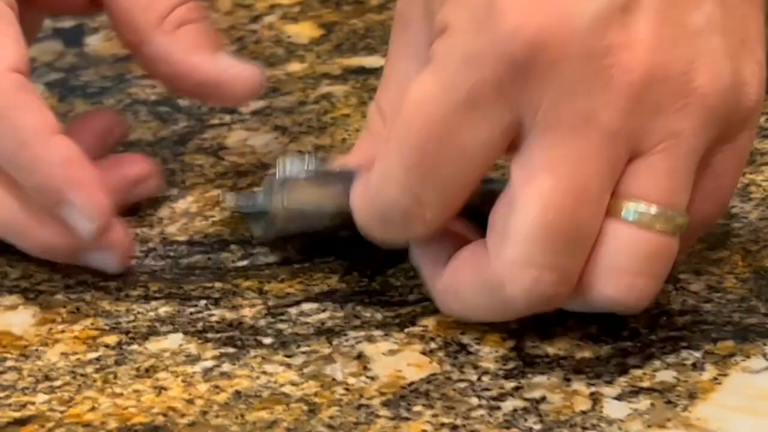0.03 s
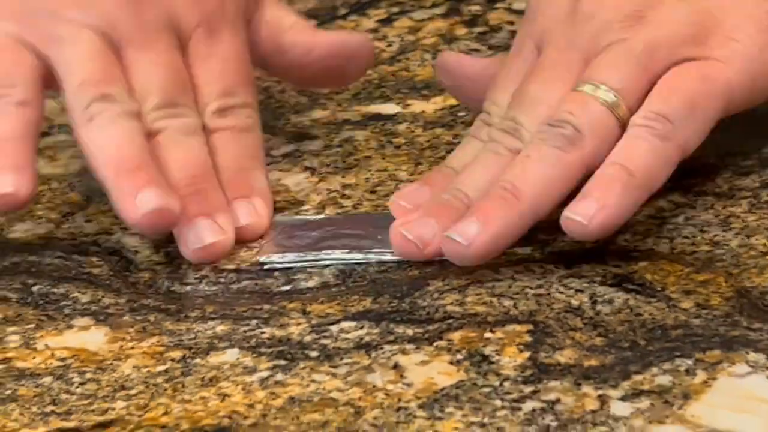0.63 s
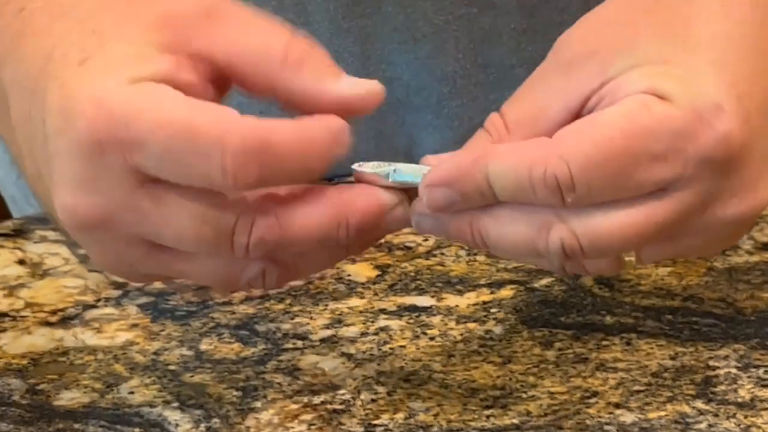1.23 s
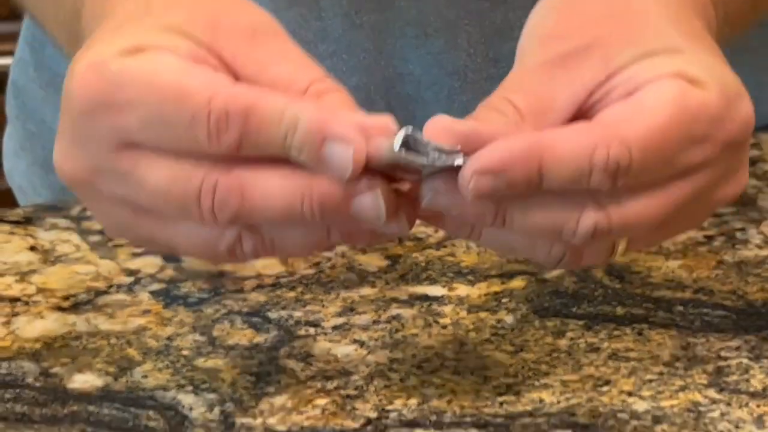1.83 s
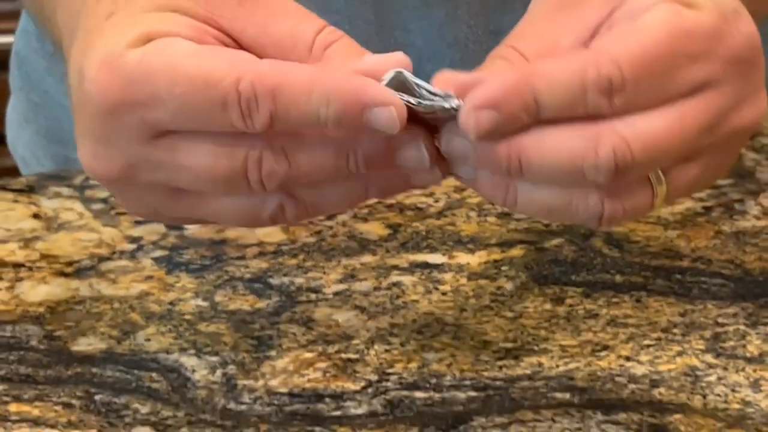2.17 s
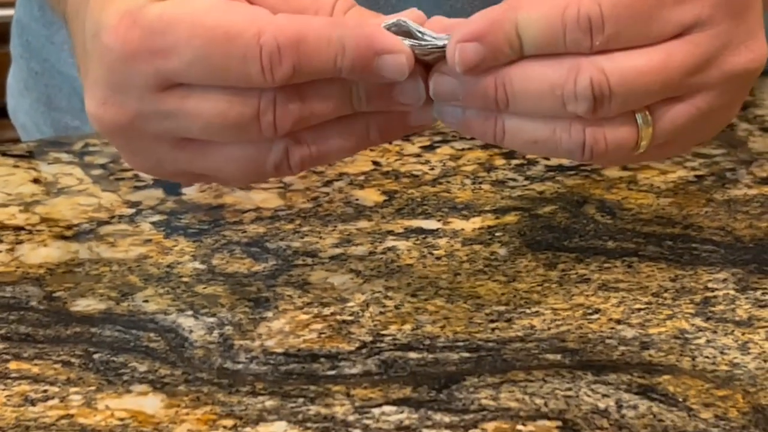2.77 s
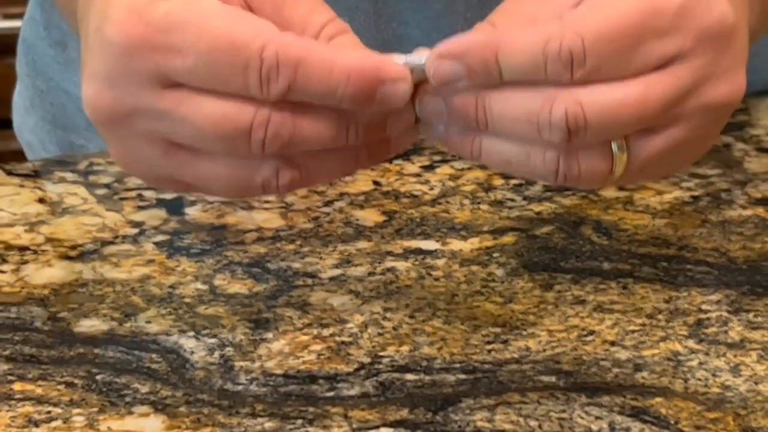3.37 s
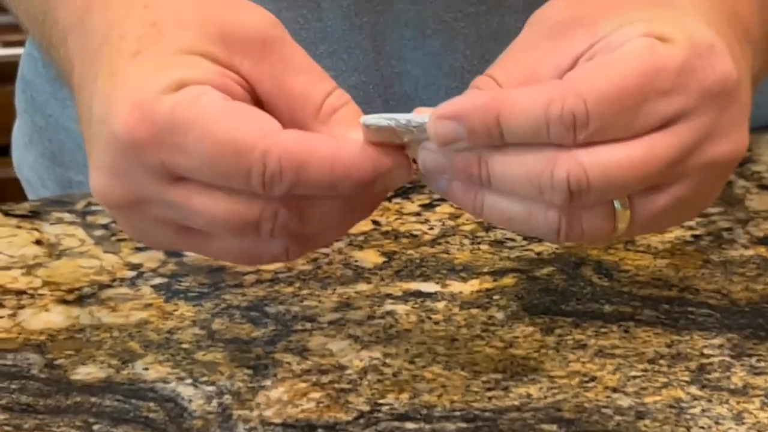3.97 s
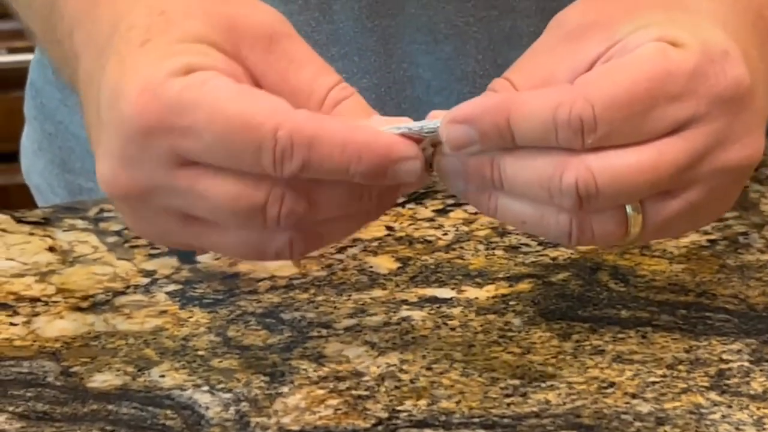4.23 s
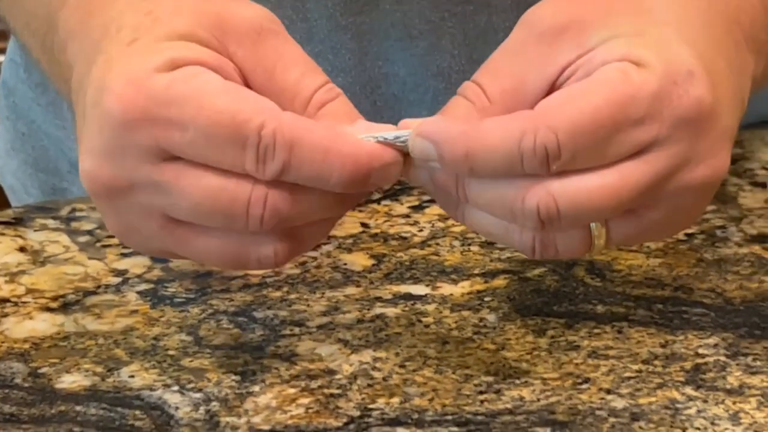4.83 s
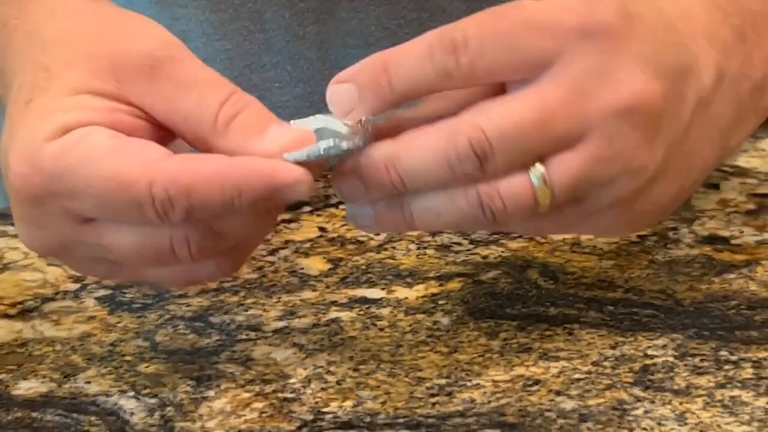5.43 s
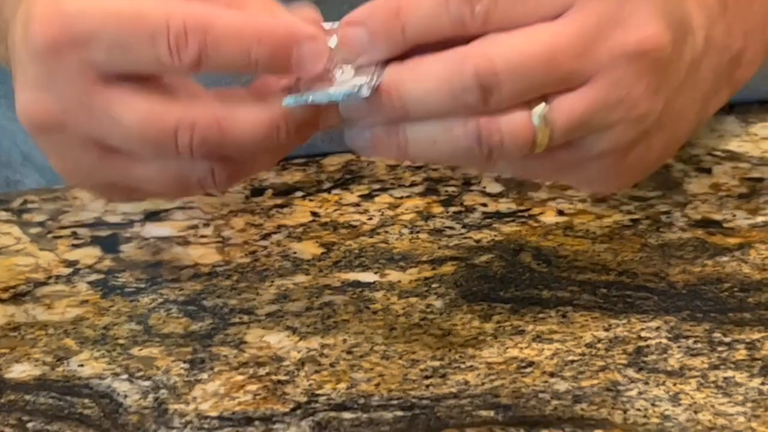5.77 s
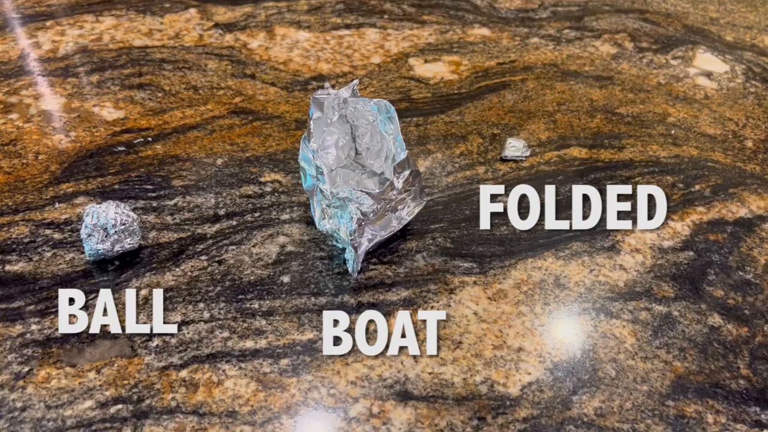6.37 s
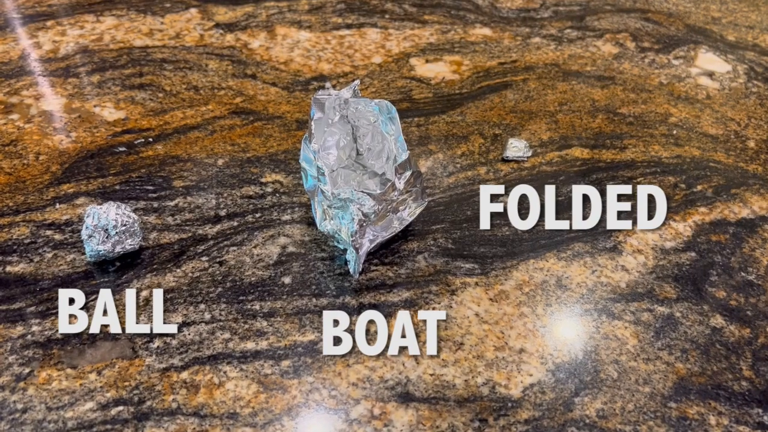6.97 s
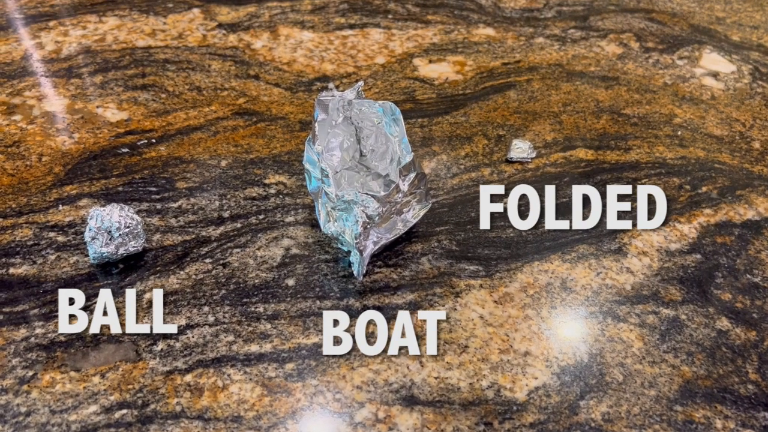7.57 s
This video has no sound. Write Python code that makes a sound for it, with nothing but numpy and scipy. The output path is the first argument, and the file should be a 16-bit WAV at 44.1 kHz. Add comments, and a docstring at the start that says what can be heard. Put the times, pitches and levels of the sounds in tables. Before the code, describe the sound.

Close, bright crinkling of foil being rubbed flat and folded tight by hand, thinning to scattered ticks in a softly humming kitchen.

```python
"""Bright crackle and rasp, close up: aluminium foil is smoothed on a stone counter, then folded and
pinched into a tight wad. With each push skin slips over the foil in tiny catches and wrinkles flip.
Creases snap, folded layers buckle with a duller pop, fingertips bump the foil and scrape its folds.
The small kitchen answers briefly; an appliance hums under it all."""
import sys
import numpy as np
from scipy import signal
from scipy.fft import rfft, irfft
from scipy.io import wavfile
from scipy.ndimage import map_coordinates

SR = 44100
rng = np.random.default_rng(int(sys.argv[2]) if len(sys.argv) > 2 else 0)


def unload_wav(signal):
    """Save mono or channel-first audio to the path in sys.argv[1] as 16-bit WAV at rate SR, clipped to [-1, 1]."""
    wavfile.write(
        sys.argv[1],
        SR,
        np.round(np.clip(np.atleast_2d(signal).T, -1, 1) * 32767).astype(np.int16),
    )


N = 334366
TIME_S = np.arange(N) / SR

# finger pushes: middle_s, half_length_s, rub_db, crinkle_db
PUSHES = [(0.054, 0.029, -41, -32), (0.137, 0.09, -42.5, -36), (0.306, 0.1, -43.5, -37),
          (0.43, 0.13, -41, -38.5), (0.66, 0.026, -47.5, -40.5), (0.699, 0.03, -39.5, -44),
          (0.818, 0.065, -49, -44.5), (0.922, 0.037, -40.5, -44.5), (0.983, 0.056, -43, -41),
          (1.039, 0.01, -39, -38), (1.107, 0.086, -45, -42), (1.278, 0.052, -53.5, -48.5),
          (1.459, 0.018, -48.5, -43.5), (1.559, 0.072, -49, -46), (1.631, 0.047, -49, -50.5),
          (1.749, 0.042, -51, -44), (1.84, 0.052, -54.5, -48), (1.969, 0.082, -51.5, -48),
          (2.203, 0.017, -57, -53.5), (2.309, 0.024, -52.5, -51), (2.433, 0.067, -56.5, -47.5),
          (2.782, 0.041, -61.5, -50.5), (3.02, 0.1, -71, -58.5), (3.365, 0.031, -40.5, -42.5),
          (3.469, 0.049, -52, -54), (3.56, 0.036, -41, -48.5), (3.672, 0.01, -52.5, -41.5),
          (3.74, 0.3, -65, -63), (3.895, 0.013, -53, -53), (4.151, 0.016, -65, -55),
          (4.315, 0.1, -78.5, -65.5), (4.698, 0.042, -48.5, -47.5), (4.837, 0.053, -56.5, -57),
          (4.917, 0.021, -54.5, -54.5), (5.058, 0.046, -59.5, -57), (5.35, 0.11, -63.5, -60.5),
          (5.43, 0.042, -56, -58.5), (5.505, 0.031, -65.5, -61), (5.686, 0.063, -70, -69),
          (5.891, 0.033, -64, -57), (6.04, 0.021, -77, -65.5), (6.372, 0.055, -77.5, -78),
          (6.778, 0.063, -74, -66), (7.267, 0.043, -70, -66.5), (7.42, 0.048, -60.5, -64),
          (7.559, 0.064, -60.5, -60)]
# skin on the flat strip: freq_hz, gain_db
FLAT_RUB_SPECTRUM = [(400, -13.5), (650, -19), (900, -4), (1150, -3.5), (1500, 2), (2300, 2), (3200, -3),
                     (4500, -13.5), (8000, -18.5)]
# skin on the wad: freq_hz, gain_db
WAD_RUB_SPECTRUM = [(300, -28.5), (480, -16), (1150, -8.5), (1550, 1.5), (2000, 2), (2700, -10.5),
                    (3800, -4.5), (6000, -20), (10000, -21.5)]
# flipping wrinkles: freq_hz, gain_db
CRINKLE_SPECTRUM = [(1000, -14), (2500, -8), (3700, -5.5), (5000, 1.5), (6300, 2.5), (6900, 0), (8600, 3.5),
                    (9900, -6.5), (11000, -21), (11700, -5.5), (12600, -30)]
# foil on stone: freq_hz, gain_db
COUNTER_SPECTRUM = [(80, -23.5), (220, -5), (600, -1), (860, 6), (2000, -21.5)]
# counter contact, offset from the rub level: time_s, offset_db
COUNTER_CONTACT = [(0.0, -4), (0.45, -6), (0.82, -27.5), (0.96, -10), (1.1, -22)]
# appliance tones: pitch_hz, rms_db
HUM_TONES = [(59, -65), (81.7, -52.5), (120, -61), (294.5, -74.5)]
# kitchen air: freq_hz, gain_db
AIR_SPECTRUM = [(25, -34.5), (60, -16.5), (140, -17.5), (300, -23), (500, -28), (640, -35), (1700, -38.5),
                (3000, -55), (12000, -60)]
# buckling layers: start_s, tick_db, pop_offset_db, ring_hz
BUCKLES = [(0.1328, -25, -4, 9000), (1.4492, -33, -1.5, 2510), (1.9524, -46.5, 10, 2190),
           (3.372, -28, -7, 1560), (3.6684, -39, -2.5, 7100), (4.7017, -33.5, 6.5, 1930),
           (4.818, -28, -0.5, 1790), (5.3251, -43.5, 7.5, 1880), (5.424, -45.5, -5, 1780),
           (7.245, -52.5, 2, 2270)]
# pop of the layers: freq_hz, gain_db
POP_SPECTRUM = [(600, -22), (1150, -22.5), (1600, 6.5), (2100, -1), (2700, -8.5), (3600, -5), (9000, -16)]
# fingertip and nail knocks: start_s, level_db
FINGER_BUMPS = [(1.1906, -38), (1.345, -41.5), (3.841, -42), (3.998, -40), (4.036, -50), (7.401, -42.5),
                (7.504, -43)]
# fingertip knock: freq_hz, gain_db
BUMP_SPECTRUM = [(200, 1), (1000, 7), (2200, 4), (3000, 0), (10000, -11)]
# fingertip drags along a fold: middle_s, half_length_s, resonance_hz, level_db
FOLD_SCRAPES = [(1.285, 0.066, 4660, -54.5), (1.666, 0.071, 4370, -70), (1.977, 0.039, 1300, -50.5),
                (2.808, 0.024, 3800, -50), (3.525, 0.013, 496, -61), (5.892, 0.025, 4800, -62.5),
                (6.791, 0.022, 5460, -65.5), (6.924, 0.024, 4670, -65.5), (7.008, 0.029, 5200, -66.5),
                (7.081, 0.033, 4800, -62.5)]
# single creases: start_s, level_db, resonance_hz
CREASE_TICKS = [(1.701, -30, 7000), (2.126, -34.5, 5900), (2.3008, -34.5, 5700), (2.305, -31, 7500),
                (2.322, -28.5, 5800), (2.3891, -36.5, 6300), (2.483, -35.5, 4870), (2.523, -31, 8100),
                (2.611, -44.5, 6940), (2.655, -39, 7000), (2.8549, -30, 4800), (2.9059, -34.5, 4700),
                (2.9298, -36, 8300), (2.967, -39, 4870), (2.985, -30, 8660), (3.0038, -21.5, 8200),
                (3.0147, -28.5, 6100), (3.3558, -21.5, 8300), (3.9494, -42.5, 8000), (4.155, -30, 8200),
                (4.2064, -41, 6370), (4.3375, -41, 7550), (4.3655, -44.5, 6000), (4.557, -50, 7240),
                (4.654, -31, 3700), (4.792, -40, 9000), (5.149, -46, 6500), (5.2958, -43.5, 2930),
                (5.3143, -43, 4250), (5.655, -47.5, 5600), (5.8277, -40, 8170), (6.812, -41.5, 4770)]
# microphone treble dips: centre_hz, width_hz, gain_db
MIC_DIPS = [(5324, 185, -41), (7603, 452, -29)]
# right microphone port resonance: centre_hz, width_hz
MIC_PORT = [(3150, 260)]


def undb(db):
    """Decibels to gain."""
    return 10 ** (np.asarray(db) / 20)


def unit(x):
    """Scale to rms 1."""
    return x / np.sqrt(np.mean(x ** 2))


def walk(rate_hz):
    """Slow random wander, spread near 1."""
    return np.sqrt(1.5) * np.interp(TIME_S * rate_hz, np.arange(N), rng.standard_normal(N))


def swell(peak_s, size):
    """Envelope: rises to 1 at peak_s, then decays."""
    age = np.arange(size) / SR / peak_s
    return age * np.exp(1 - age)


def colour(x, spectrum, size=2048):
    """Minimum-phase filter of unit energy, shaped to the spectrum."""
    hz, db = np.transpose(spectrum)
    bins_hz = np.maximum(np.fft.rfftfreq(size, 1 / SR), 1)
    gain = undb(np.interp(np.log(bins_hz), np.log(hz), db))
    cepstrum = irfft(np.log(gain))
    cepstrum[1:size // 2] *= 2
    cepstrum[size // 2 + 1:] = 0
    response = irfft(np.exp(rfft(cepstrum)))
    return signal.fftconvolve(x, response[None] / np.linalg.norm(response), axes=1)[:, :N]


def pan(left_db):
    """Stereo gains, left over right by left_db."""
    return undb(np.array([[left_db], [-left_db]]) / 2)


def radiate(x, left_db, scatter):
    """Each facet faces its own way: left and right get random shares of each impulse."""
    shares = 1 + scatter * rng.standard_normal((2, N))
    return x * shares / np.hypot(1, scatter) * pan(left_db)


def grains(level_db, rate_hz, spread_db, growth=0.4, ref_db=-49.5, bunch_db=1.5, bunch_hz=130):
    """Tiny random slips in bunches; rate_hz holds at ref_db, harder work makes more."""
    per_s = np.clip(rate_hz * undb(growth * (level_db - ref_db)), 1, SR / 2)
    fires = rng.random(N) < per_s / SR
    sizes = unit(undb(spread_db * np.minimum(rng.exponential(size=N), 4)))
    signs = np.sign(rng.standard_normal(N))
    bunches = unit(undb(bunch_db * walk(bunch_hz)))
    return fires * sizes * signs * np.sqrt(SR / per_s) * bunches * undb(level_db)


def finger_levels_db(release_stretch=1.084, shape=1.3, stir_fall_db_per_s=8.5, wander_db=3.5):
    """Rub and crinkle levels: pushes swell over the held foil's stir, which fades as it packs tighter."""
    stir_db = np.maximum(-47 - stir_fall_db_per_s * TIME_S, -92) + wander_db * walk(rate_hz=7.1)
    power = undb([stir_db, stir_db + 3]) ** 2  # rows: rub, crinkle
    for middle_s, half_s, rub_db, crinkle_db in PUSHES:
        near = np.abs(TIME_S - middle_s) < 10 * half_s
        offset_s = TIME_S[near] - middle_s
        away = np.maximum(-offset_s, offset_s / release_stretch) / half_s
        envelope = np.exp(-away ** shape)  # shape 1: pointed, 2: bell
        power[:, near] += (undb([[rub_db], [crinkle_db]]) * envelope) ** 2
    return 10 * np.log10(power)


def rubbing(level_db, fold_span_s=(2.2, 3.2), right_lag_s=0.00002):
    """Skin catches and slips on foil; the flat strip's broad rasp turns hollow as the wad thickens."""
    slips = grains(level_db, rate_hz=3800, spread_db=2.0)
    folded = np.interp(TIME_S, fold_span_s, [0, 1])
    flat_slips = radiate(slips * np.sqrt(1 - folded), left_db=-1.6, scatter=0.29)
    wad_slips = radiate(slips * np.sqrt(folded), left_db=1.0, scatter=0.24)
    left, right = colour(flat_slips, FLAT_RUB_SPECTRUM)
    flat = np.array([left, np.interp(TIME_S - right_lag_s, TIME_S, right)])
    return undb(2.5) * flat + undb(1.7) * colour(wad_slips, WAD_RUB_SPECTRUM)


def crinkling(level_db):
    """Small wrinkles flip in a dense, bright crackle; stray ones tick alone."""
    flips = grains(level_db, rate_hz=4500, spread_db=0.5)
    strays = undb(-8) * grains(np.minimum(level_db, -58), rate_hz=120, spread_db=-2.5, growth=0.2)
    return colour(radiate(flips + strays, left_db=4.5, scatter=0.75), CRINKLE_SPECTRUM)


def shifting_facets(x, depth_db=5.5, width_hz=170, life_s=0.06, apart_db=3.0, size=512):
    """Resonances come and go as the foil deforms, slightly differently on each side."""
    _, _, bands = signal.stft(x, nperseg=size)
    grid = bands.shape[1:]
    span_bins = max(width_hz * size / SR, 1)
    span_frames = max(life_s * SR / (size / 2), 1)
    place = np.indices(grid) / np.reshape([span_bins, span_frames], (2, 1, 1))
    mid, side = (map_coordinates(rng.standard_normal(grid), place, order=2) for _ in range(2))
    gain = unit(undb(depth_db * np.tanh(mid) + apart_db * np.array([side, -side])))
    return signal.istft(bands * gain, nperseg=size)[1][:, :N]


def sliding(rub_db, lift_span_s=(1.5, 2.4)):
    """The strip drags over stone with a lower rustle until the hands lift it."""
    contact_db = np.interp(TIME_S, *np.transpose(COUNTER_CONTACT))
    lift_db = np.interp(TIME_S, lift_span_s, [0, -25])
    drag = grains(rub_db + contact_db + lift_db, rate_hz=4500, spread_db=-0.5)
    return colour(radiate(drag, left_db=-0.5, scatter=0.15), COUNTER_SPECTRUM)


def appliance_hum(waver_db=0.5, drift_rad=0.13, start_db=-9.5, settle_s=2.75):
    """Motor and mains tones waver and swell towards full level."""
    hum = 0
    for hz, rms_db in HUM_TONES:
        amplitude = np.sqrt(2) * undb(rms_db + waver_db * walk(rate_hz=1.0))
        hum += amplitude * np.sin(2 * np.pi * hz * TIME_S + drift_rad * walk(rate_hz=2.7))
    return undb(start_db * np.exp(-TIME_S / settle_s)) * hum


def room_air(level_db=-63, wide_above_hz=900):
    """Soft air noise: mono bass, wide treble."""
    mid, side = colour(rng.standard_normal((2, N)), AIR_SPECTRUM, size=8192)
    side = signal.sosfilt(signal.butter(1, wide_above_hz, "high", fs=SR, output="sos"), side)
    return undb(level_db) * (mid + 0.76 * np.array([side, -side]))


def crease_tick(hz, size, peak_s=0.00073, q=3.1, scatter=0.65, lowpass_hz=10500):
    """One crease gives way: an avalanche of tiny cracks through a broad resonance."""
    cracks = np.sign(rng.standard_normal(size)) * swell(peak_s, size)
    shares = 1 + scatter * rng.standard_normal((2, size))
    burst = signal.lfilter(*signal.iirpeak(hz, q, fs=SR), cracks * shares)
    burst = signal.lfilter(*signal.butter(2, lowpass_hz, fs=SR), burst)
    return burst / np.abs(burst.mean(axis=0)).max() * pan(left_db=3.5)


def buckling(tick_hz=8000, pop_rise_s=0.0029, ring_rise_cycles=2.27, size=1024):
    """A crease ticks, the stacked layers pop more slowly and the freed facet rings."""
    age_s = np.arange(size) / SR
    facet, pops = np.zeros((2, N + size)), np.zeros(N + size)
    for start_s, tick_db, pop_offset_db, hz in BUCKLES:
        when = slice(int(start_s * SR), int(start_s * SR) + size)
        pop = np.sign(rng.standard_normal(size)) * swell(pop_rise_s, size)
        pops[when] += undb(tick_db + pop_offset_db) * pop
        strike = undb(-11) * (1 + 3.2 * undb(pop_offset_db))  # a bigger buckle strikes harder
        ring = strike * np.sin(2 * np.pi * hz * age_s) * swell(ring_rise_cycles / hz, size)
        facet[:, when] += undb(tick_db) * (crease_tick(tick_hz, size) + ring)
    layers = colour(radiate(pops[:N], left_db=5.5, scatter=0.3), POP_SPECTRUM)
    return facet[:, :N] + undb(-8) * layers


def bumping(contact_s=0.0034):
    """A soft fingertip knocks the foil: short, dull, no ring."""
    force = 0
    for start_s, level_db in FINGER_BUMPS:
        age = np.maximum(TIME_S - start_s, 0) / contact_s
        force += undb(level_db) * age * np.exp(-age)
    knocks = force * np.sign(rng.standard_normal(N))
    return colour(radiate(knocks, left_db=1.0, scatter=0.47), BUMP_SPECTRUM)


def scraping(q_at_1khz=3.7, slips_per_s=1500):
    """Stick-slip along a fold keeps one resonance ringing; higher ones are broader."""
    out = 0
    for middle_s, half_s, hz, level_db in FOLD_SCRAPES:
        slips = (rng.random(N) < slips_per_s / SR) * rng.standard_normal(N)
        fold = signal.iirpeak(hz, q_at_1khz * np.sqrt(1000 / hz), fs=SR)
        ring = signal.lfilter(*fold, signal.lfilter(*fold, slips))
        envelope = np.exp(-((TIME_S - middle_s) / half_s) ** 2)
        out += undb(level_db) * unit(ring) * envelope
    return out


def ticking(size=1024):
    """Single creases flick over, dry and bright, each at its own resonance."""
    out = np.zeros((2, N + size))
    for start_s, level_db, hz in CREASE_TICKS:
        start = int(start_s * SR)
        out[:, start:start + size] += undb(level_db) * crease_tick(hz, size)
    return out[:, :N]


def kitchen(x, t60_s=0.3, wet_db=-14, gap_s=0.0069, size=22050):
    """Counter and cupboards return a short, diffuse tail."""
    age_s = np.arange(size) / SR
    tail = rng.standard_normal((2, size)) * undb(-60 * age_s / t60_s) * (age_s > gap_s)
    tail /= np.linalg.norm(tail, axis=1, keepdims=True)
    return x + undb(wet_db) * signal.fftconvolve(x, tail, axes=1)[:, :N]


def scene():
    """Foil in the kitchen, over hum and air."""
    rub_db, crinkle_db = finger_levels_db()
    rustle = shifting_facets(rubbing(rub_db) + crinkling(crinkle_db))
    foil = rustle + ticking() + buckling() + sliding(rub_db) + scraping() + bumping()
    return kitchen(foil) + appliance_hum() + room_air()


def record(dry):
    """Microphone: two narrow treble dips, a phase turn in the right port, a steep cut at 12 kHz."""
    bins_hz = np.fft.rfftfreq(N, 1 / SR)
    dips_db = sum(db / (1 + (2 * (bins_hz - hz) / width_hz) ** 8) for hz, width_hz, db in MIC_DIPS)
    turn_rad = sum(2 * np.arctan2(bins_hz * width_hz, hz ** 2 - bins_hz ** 2) for hz, width_hz in MIC_PORT)
    response = undb(dips_db) * np.exp(-1j * np.outer([0, 1], turn_rad))
    lowpass = signal.ellip(8, 0.2, 70, 12000, fs=SR, output="sos")
    return signal.sosfilt(lowpass, irfft(rfft(dry) * response, N))


dry = scene()
out = record(dry)
unload_wav(out)
```